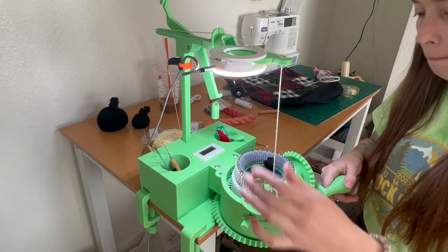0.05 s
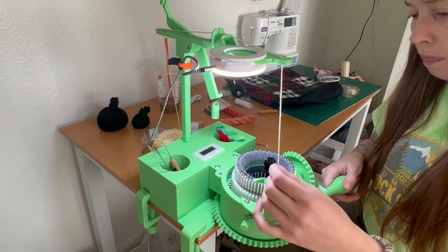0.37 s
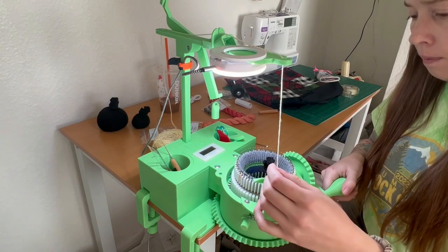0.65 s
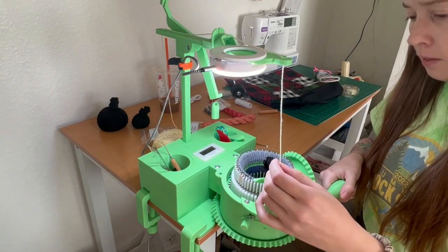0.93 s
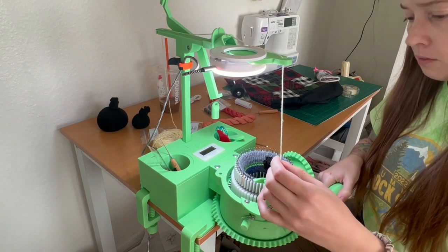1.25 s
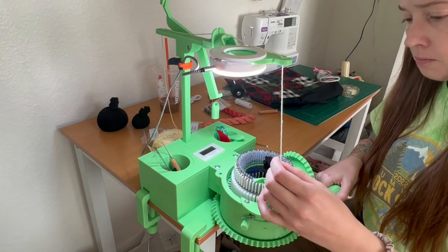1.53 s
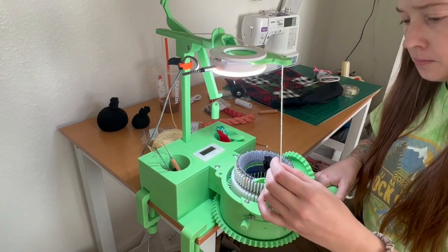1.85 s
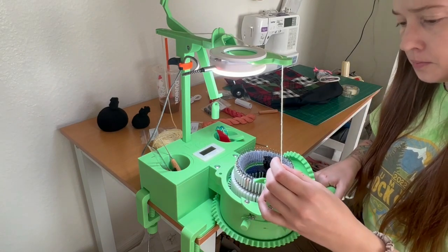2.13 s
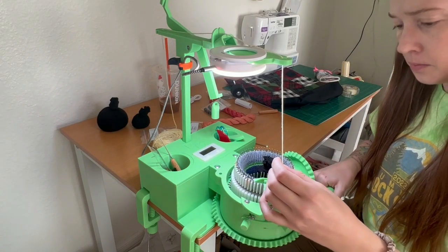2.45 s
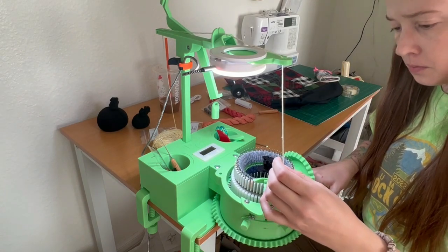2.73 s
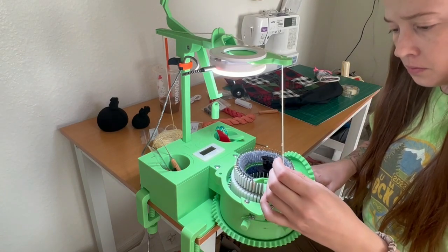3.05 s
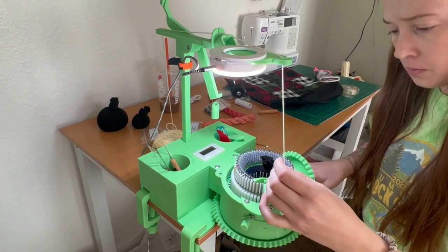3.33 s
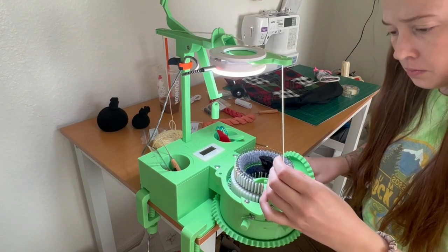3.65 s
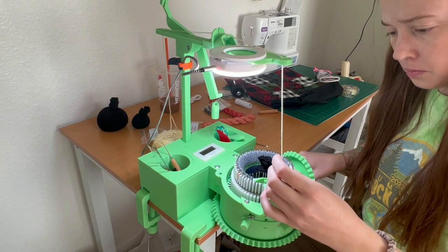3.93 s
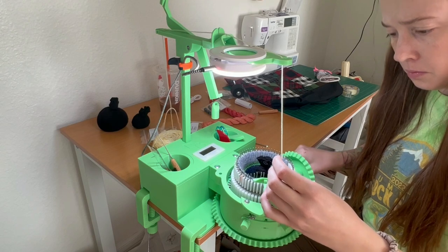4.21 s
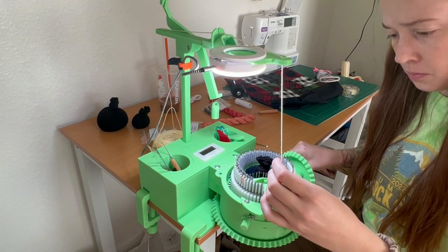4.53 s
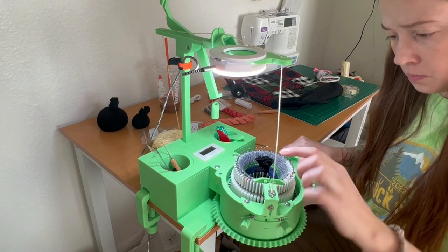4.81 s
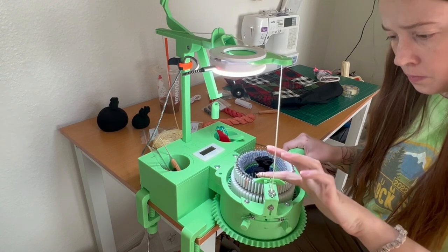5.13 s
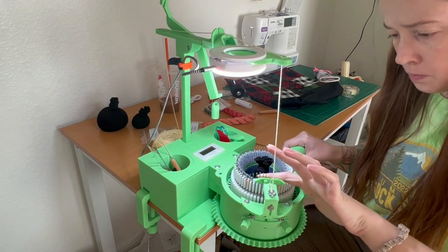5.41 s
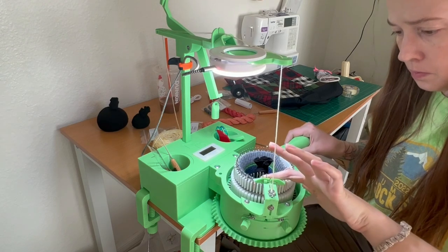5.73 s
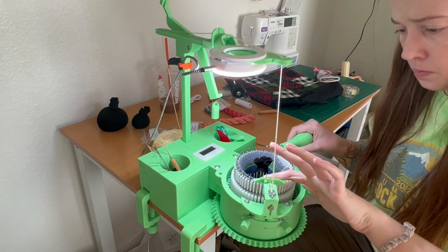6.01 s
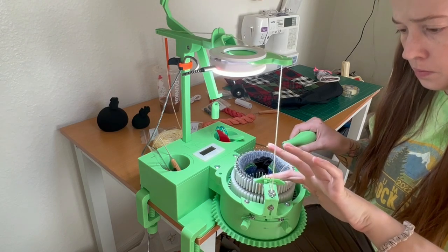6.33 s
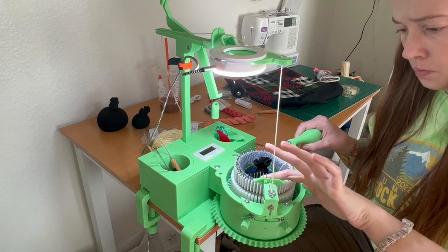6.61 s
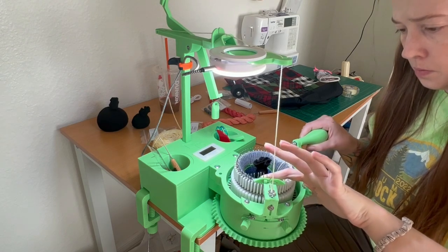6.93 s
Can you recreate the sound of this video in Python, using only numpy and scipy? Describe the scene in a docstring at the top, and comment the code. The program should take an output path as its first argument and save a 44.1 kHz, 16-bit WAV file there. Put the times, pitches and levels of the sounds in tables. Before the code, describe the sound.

A slowly cranked knitting machine gives uneven steel needle clicks and small plastic knocks over a faint gear rumble in a quiet room.

```python
"""A small, quiet room with bare walls. On a wooden table, a little to the left of the microphone,
a plastic sock knitting machine is cranked slowly. Each steel needle clicks as the cam picks it up
and its latch flips, slides faintly in its slot, then knocks against the cylinder as it drops.
The gears rumble in the table and the walls answer every blow. Behind it all lie still air,
a faint hum and the deep rumble of the building."""
import sys
import numpy as np
from scipy import signal
from scipy.fft import rfft, irfft, next_fast_len
from scipy.io import wavfile

SR = 44100
rng = np.random.default_rng(int(sys.argv[2]) if len(sys.argv) > 2 else 0)


def inscribe(sig):
    """Save sig as 16-bit PCM at rate SR to the path in sys.argv[1].

    A 1-D sig is mono; a 2-D sig holds one channel per row.
    Samples are clipped to [-1, 1] before scaling.
    """
    pcm = np.round(np.clip(np.atleast_2d(sig).T, -1, 1) * 32767)
    wavfile.write(sys.argv[1], SR, pcm.astype(np.int16))


N = 311346

# Needles passing the cam. Each row: start of the slide and drop in seconds, effort on the crank in dB.
NEEDLES = [(1.035, 1.1044, -4), (1.372, 1.4706, -0.5), (1.793, 1.9852, -12.5), (2.508, 2.5397, -1),
           (2.766, 2.8277, -3), (3.111, 3.165, 0), (3.409, 3.4415, 6.5), (3.612, 3.648, -6),
           (3.71, 3.762, -4.5), (4.11, 4.1436, 0), (4.188, 4.2807, 2), (4.61, 4.652, -8),
           (4.949, 5.0743, -16), (5.464, 5.4984, 3), (5.543, 5.5814, 6.5), (5.715, 5.779, -1),
           (6.025, 6.0816, -0.5), (6.415, 6.4797, 3), (6.59, 6.676, 2), (6.88, 6.94, 4.5)]
# Modes of the plastic housing. Each row: frequency in Hz, level in dB, t60 in seconds.
HOUSING_MODES = [(473, -25, 0.031), (748, -17, 0.019), (908, -11.5, 0.028), (1060, -23.5, 0.02),
                 (1213, -14, 0.017), (1436, -0.5, 0.014), (1571, -1.5, 0.012), (1698, -6, .015),
                 (2150, -5.5, 0.02), (2415, -1, 0.02), (2627, -1.5, 0.017), (2693, 4.5, 0.017),
                 (3122, -1.5, 0.017), (4240, -16.5, 0.021)]
# Diffuse sound at the microphone. Each row: frequency in Hz, left-right correlation.
DIFFUSE_LIKENESS = [(40, 0.83), (130, 0.86), (290, 0.39), (640, 0), (3000, 0.17), (15000, 0)]


def clicks():
    """Steel on steel: needles and latches chatter and ring thinly; gentler contacts are duller."""
    # Each row: time in seconds, strength in dB, ring near 3.2 kHz in dB.
    contacts = [(.4804, -36, 15.5), (.7716, -31, 1), (.8295, -26.5, 11), (.9238, -37, 4), (1.0356, 5, 0),
                (1.3802, -18, 11), (1.393, -4.5, 0), (1.7938, -12.5, 15), (1.8228, 4, -11),
                (1.8702, -7.5, -1), (1.9152, -11, -4), (2.0748, -16, 11), (2.2335, -22, -2),
                (2.3871, -27.5, 6), (2.5069, 1, 8), (2.7067, -18, 6), (2.7928, -1, 6.5), (2.7977, 6, -4.5),
                (3.0925, -25, -15), (3.1278, 0.5, 6.5), (3.1328, -4, 9), (3.1419, -3, -11),
                (3.3976, -15, 10), (3.4231, 6.5, -0.5), (3.6209, 2.5, 7.5), (3.6301, 3.5, -18),
                (3.7158, 4, -9), (3.737, 2.5, 2), (4.0463, -20, 10), (4.1188, 3, 3.5), (4.1258, 3, 2),
                (4.2134, -.5, 2), (4.2406, 2, 1), (4.6211, 1.5, -2), (4.6309, 4, -2), (4.901, -14.5, 13),
                (4.9741, 0, 3), (5.0054, -4, -2), (5.4687, 1, 10), (5.4876, 5.5, -4), (5.5585, 6, 0),
                (5.5704, 2.5, -1), (5.707, 0.5, 2), (5.7436, -2, -3), (6.0449, 3, -4), (6.0528, -0.5, 4.5),
                (6.4202, -1, 7.5), (6.443, 1, -2), (6.6219, 0.5, 3.5), (6.6398, -5.5, -8), (6.8959, -4, -2),
                (6.9079, 2.5, 2.5), (6.9221, 2.5, -5)]
    # The colour of a steel click. Each row: frequency in Hz, level in dB.
    steel_spectrum = [(100, -21), (300, -18), (550, -24.5), (850, -12.5), (1200, -19.5), (1800, -5),
                      (2400, -4), (3150, 0), (3700, -.5), (6300, 0), (9000, -3), (11800, 0.5),
                      (15500, -13.5)]
    # Colour by force. Each row: strength, body near 1.7 kHz, edge from 11 kHz up, all in dB.
    touch = [(-25, 12.5, -15), (-5, 9, 6.5), (-2.5, -1, 2.5), (0, -0.5, 0)]
    strengths, bodies, edges = np.transpose(touch)
    body_per_ring, scatter_db = 0.12, 2.4  # a click that rings more also has more body
    t = clock(size=1536)
    for s, db, ring_db in [*contacts, *latch_ticks()]:
        body_db = np.interp(db, strengths, bodies) + body_per_ring * ring_db
        body_db += scatter_db * rng.standard_normal()
        edge_db = np.interp(db, strengths, edges) + scatter_db * rng.standard_normal()
        pitches = np.geomspace(3000, 14000, num=10) * np.exp(.09 * rng.standard_normal(10))
        needle = ring([(hz, 0, .028) for hz in pitches], t, attack=0.00013, vary_db=0.5, spread=0.86)
        strike = unit_energy(chatter(t, attack=0.001, t60=.024) + amp(-12) * needle)
        own_colour = [(500, body_db / 2), (1000, body_db), (1700, body_db), (3200, ring_db),
                      (5000, 0.009), (7000, 0.0071), (11000, edge_db)]
        click = coloured(strike, lambda hz: along(steel_spectrum, hz) + along(own_colour, hz))
        yield s - .0005, amp(db) * click


def latch_ticks(max_lead_s=0.068, db=-30, scatter_db=4):
    """An idle latch ticks faintly just before its needle moves; gives contact rows for clicks()."""
    draws = rng.random((len(NEEDLES), 2))
    return [(start - max_lead_s * early, db - scatter_db * (2 * softness - 1), 0)
            for (start, _, _), (early, softness) in zip(NEEDLES, draws)]


def knocks():
    """A needle drops off the cam: it rattles in its slot and the housing rings."""
    # The colour of the rattle. Each row: frequency in Hz, level in dB.
    rattle_spectrum = [(150, -11), (350, -10), (700, -6), (950, -0.5), (1400, 0.5), (2000, -2), (2600, 4.5),
                       (4200, 3), (6500, -1), (8500, -2), (11000, -1.5), (15500, -8)]
    t = clock(size=2048)
    for _, drop, _ in NEEDLES:
        rattle = coloured(chatter(t, attack=0.0021, t60=.027), lambda hz: along(rattle_spectrum, hz))
        housing = ring(HOUSING_MODES, t, attack=0.0035, vary_db=0.5, spread=0.45)
        yield drop, amp(-7) * housing + amp(-4) * rattle


def hand_bumps():
    """The hand bumps the frame: a soft contact that stirs mainly the low modes of the housing."""
    # Each row: time in seconds, strength in dB.
    bumps = [(0.004, -27), (0.034, -33), (0.05, -26.5), (0.068, -26.5), (0.555, -32), (0.605, -35),
             (0.829, -32)]
    # The colour of a soft contact. Each row: frequency in Hz, gain in dB.
    soft_spectrum = [(60, 6), (180, 16.5), (550, 5.5), (1000, 2.5), (1700, 3.5), (2800, -8.5), (8000, -17)]
    t = clock(size=4096)
    for s, db in bumps:
        housing = ring(HOUSING_MODES, t, attack=0.0018, vary_db=7.5, spread=1.0)
        thud = amp(-15) * housing + chatter(t, attack=0.0042, t60=0.055)
        yield s, amp(db) * coloured(thud, lambda hz: along(soft_spectrum, hz))


def latch_pings():
    """A loose latch swings free on its rivet and rings on one thin note."""
    # Each row: time in seconds, pitch in Hz, strength in dB.
    pings = [(0.4804, 4830, -42), (0.7095, 4040, -38), (4.0463, 3230, -18), (4.901, 3270, -24)]
    t = clock(size=2048)
    for s, hz, db in pings:
        yield s, amp(db) * ring([(hz, 0, .03)], t, attack=.0005, vary_db=1, spread=0.44)


def machine_blows(spot_count=5, right_lag_s=.000068, echo_trim_db=-0.66):
    """Blows land in turn on spots round the cylinder, each with its own echoes; the left port leads."""
    spots = np.zeros((spot_count, 2, N))
    for k, (s, sound) in enumerate([*clicks(), *knocks(), *hand_bumps(), *latch_pings()]):
        add(spots[k % spot_count], s, sound)
    shared_echoes = noise(DIFFUSE_LIKENESS, np.ones_like, size=20000)
    port_phase = lambda hz: np.exp(np.outer([1j, -1j], np.pi * hz * right_lag_s))
    direct = filtered(spots.sum(axis=0), port_phase)
    return direct + amp(echo_trim_db) * sum(room(spot, shared_echoes) for spot in spots)


def gears(idle_db=-67.5, loaded_db=-61, lead_s=0.0067):
    """The gears rumble unevenly, louder as they take the load just before each needle moves."""
    # Each row: frequency in Hz, level in dB.
    gear_spectrum = [(40, -19), (90, -12), (135, 0.5), (205, -6.5), (250, -7.5), (300, 0), (420, -11.5),
                     (700, -12), (1500, -30.5), (4000, -67)]
    power = amp(idle_db) ** 2
    for start, drop, effort_db in NEEDLES:
        power += stroke_power(start - lead_s, drop, loaded_db + effort_db, fall_db_per_s=44.5)
    return np.sqrt(power) * unit(diffuse_noise(gear_spectrum) * amp(3.4 * wobble(22)))


def scraping(catch_db=4, grain_db=3.5):
    """Needles and yarn scrape in small catches, a needle hardest as the cam picks it up."""
    # The crank creeps and the yarn drags. Each row: start and end in seconds, level in dB.
    drags = [(0.545, 0.602, -61.5), (0.77, 1.026, -62), (1.74, 1.96, -53.5), (2.08, 2.326, -62),
             (4.563, 4.61, -63)]
    # The colour of the friction. Each row: frequency in Hz, level in dB.
    slide_spectrum = [(300, -14), (700, 1), (1100, -2), (1700, 4.5), (3500, 4.5), (6500, -6), (9500, -13.5),
                      (12000, -13.5), (15500, -22.5)]
    power = sum(stroke_power(start, end, db) for start, end, db in drags)
    for start, _, _ in NEEDLES:
        # a faint hiss swells just before each needle's click
        power += stroke_power(start, start, db=-66.5, rise_db_per_s=172)
        power += stroke_power(start, start, db=-51.5, fall_db_per_s=61)  # the needle slides
    friction = diffuse_noise(slide_spectrum)
    roughness = amp(catch_db * wobble(45) + grain_db * wobble(400))
    return np.sqrt(power) * unit(friction * roughness)


def room(sound, shared_echoes):
    """The walls' answer builds up, then each frequency dies at its own speed; each spot's differs."""
    # Each row: frequency in Hz, t60 in seconds.
    decay_times = [(150, 0.4), (530, .5), (1400, 0.51), (2600, 0.35), (3700, 0.4546), (7000, 0.3836),
                   (10000, 0.29), (15000, 0.23)]
    # The colour of the reflections. Each row: frequency in Hz, level in dB.
    wall_spectrum = [(150, 7), (500, 6.5), (880, 2.3), (1400, 2.1), (1900, 1), (2700, -2.5), (5000, 1),
                     (8500, 1), (10000, -6.5), (12000, -11), (15500, -9.5)]
    size = shared_echoes.shape[1]
    echoes = unit(shared_echoes + 1.8 * noise(DIFFUSE_LIKENESS, np.ones_like, size=size))
    hz, when, spectra = signal.stft(echoes, SR, nperseg=256)
    t60 = along(decay_times, hz)[:, None]
    equal_energy = np.sqrt(2 * np.log(1000) / (t60 * SR))
    gain = amp(along(wall_spectrum, hz)[:, None] - 60 * when / t60) * equal_energy
    tail = signal.istft(spectra * gain, SR, nperseg=256)[1][:, :size]
    tail *= onset(clock(size), attack=0.0025)
    return signal.oaconvolve(sound, tail, axes=1)[:, :N]


def room_tone():
    """Still air, the building's slowly swelling rumble and a faint wavering hum."""
    # Each row: frequency in Hz, level in dB.
    air_spectrum = [(15, -36), (25, -14.5), (36, 3.5), (70, -3.5), (110, -5.5), (220, -14.5), (330, -10.5),
                    (550, -15), (1000, -30), (1500, -24.5), (2500, -34.5), (6000, -35.5), (9000, -35.5),
                    (15000, -40)]
    # Each row: time in seconds, level in dB.
    rumble_levels = [(0, -61.5), (1, -68.5), (2.4, -68), (4, -60), (5.3, -72.5), (5.998, -70),
                     (7.06, -65.5)]
    swell = amp(np.interp(clock(N), *np.transpose(rumble_levels)))
    rumble = swell * narrow_noise(centre_hz=35.5, half_width_hz=3)
    air = amp(-65.5) * diffuse_noise(air_spectrum)
    hum = amp(-75) * narrow_noise(centre_hz=156, half_width_hz=1.8)
    return air + rumble + hum


def ring(modes, t, attack, vary_db, spread):
    """Damped modes (Hz, dB, t60) at random strengths; spread scatters each port's phase, in radians."""
    hz, db, t60 = np.transpose(modes)
    phase = rng.uniform(0, 2 * np.pi, len(hz)) + spread * rng.standard_normal((2, len(hz)))
    weights = amp(db + vary_db * rng.standard_normal(len(hz))) * np.exp(1j * phase)
    waves = weights @ np.exp(np.outer(2j * np.pi * hz - np.log(1000) / t60, t))
    return unit_energy(waves.real * onset(t, attack))


def chatter(t, attack, t60):
    """The brief noise of a contact, dying by 60 dB in t60 seconds."""
    # Direct sound at the microphone. Each row: frequency in Hz, left-right correlation.
    direct_likeness = [(200, 1), (1000, .7), (2500, 0.92), (5000, 0.046), (8500, 0.2), (12500, 0.74),
                       (15500, 0.73)]
    hiss = noise(direct_likeness, np.ones_like, size=len(t))
    return unit_energy(hiss * onset(t, attack) * amp(-60 * t / t60))


def stroke_power(start, end, db, rise_db_per_s=699, fall_db_per_s=137):
    """Power of one movement: a rise, a hold from start to end, a steady fall."""
    t = clock(N)
    level = db - rise_db_per_s * np.maximum(start - t, 0) - fall_db_per_s * np.maximum(t - end, 0)
    return amp(np.maximum(level, -160)) ** 2


def noise(likeness, gain_of_hz, size):
    """Stereo noise of rms 1 with a given left-right likeness and spectrum."""
    m = next_fast_len(size, True)
    hz = np.fft.rfftfreq(m, 1 / SR)
    correlation = np.clip(along(likeness, hz), -1, 1)
    white = rng.standard_normal((2, len(hz), 2)).view(complex)[..., 0]
    mid, side = white * np.sqrt([1 + correlation, 1 - correlation])
    return unit(irfft(np.array([mid + side, mid - side]) * gain_of_hz(hz), m)[:, :size])


def diffuse_noise(spectrum):
    """Noise from all round the microphone, shaped by (Hz, dB) points."""
    return noise(DIFFUSE_LIKENESS, lambda hz: amp(along(spectrum, hz)), size=N)


def narrow_noise(centre_hz, half_width_hz):
    """A thin band of diffuse noise, heard as a wavering tone."""
    return noise(DIFFUSE_LIKENESS, lambda hz: 1 / (1 + ((hz - centre_hz) / half_width_hz) ** 2), size=N)


def amp(db):
    """Decibels to gain."""
    return 10 ** (np.asarray(db) / 20)


def unit(x):
    """x at rms 1."""
    return x / np.sqrt(np.mean(x ** 2) + 1e-20)


def unit_energy(x):
    """x at a mean energy of 1 per channel."""
    return unit(x) / np.sqrt(x.shape[-1])


def along(points, hz):
    """(Hz, value) points read on a log axis."""
    freqs, values = np.transpose(points)
    return np.interp(np.log(hz + 1), np.log(freqs + 1), values)


def onset(t, attack):
    """A smooth rise from 0 to 1 over about attack seconds."""
    return 1 - np.exp(-(t / attack) ** 2)


def wobble(rate):
    """A random curve, rate knots a second."""
    knots = rng.standard_normal(int(N * rate / SR) + 4)
    return np.interp(np.arange(N) * rate / SR, np.arange(len(knots)), knots)


def filtered(x, response):
    """x times a response of frequency."""
    n = x.shape[-1]
    m = next_fast_len(n + n // 10)
    return irfft(rfft(x, m) * response(np.fft.rfftfreq(m, 1 / SR)), m)[..., :n]


def coloured(x, db_of):
    """x through a minimum-phase filter with the gain db_of(Hz), which keeps attacks sharp."""
    n = x.shape[-1]
    cepstrum = irfft(np.log(amp(db_of(np.fft.rfftfreq(n, 1 / SR)))), n)
    cepstrum[1:n // 2] *= 2
    cepstrum[n // 2 + 1:] = 0
    return irfft(rfft(x) * np.exp(rfft(cepstrum)), n)


def clock(size):
    """Sample times in seconds."""
    return np.arange(size) / SR


def add(track, s, sound):
    """Mix a sound in at s seconds."""
    start = max(round(s * SR), 0)
    part = track[:, start:start + sound.shape[1]]
    part += sound[:, :part.shape[1]]


def scene():
    """The machine in its room, nearer the microphone's left port."""
    # Each row: frequency in Hz, left minus right in dB.
    balance = [(100, 2.3), (1000, 2.2), (6000, 2.6), (9000, 0), (15000, -.6)]
    sound = machine_blows() + gears() + scraping() + room_tone()
    return filtered(sound, lambda hz: amp(np.outer([1, -1], along(balance, hz)) / 2))


def record(dry):
    """The treble has three dips, the deepest near 11 kHz, and the very top is cut off steeply."""
    # Each row: centre in Hz, half width in Hz, gain in dB.
    dips = [(5360, 154, -6.5), (7590, 340, -7), (10930, 850, -13.5)]
    top_hz = 15900
    dips_db = lambda hz: sum(db * np.exp(-((hz - centre) / width) ** 2) for centre, width, db in dips)
    return filtered(dry, lambda hz: amp(dips_db(hz)) / (1 + (hz / top_hz) ** 120))


dry = scene()
out = record(dry)
inscribe(out)
```